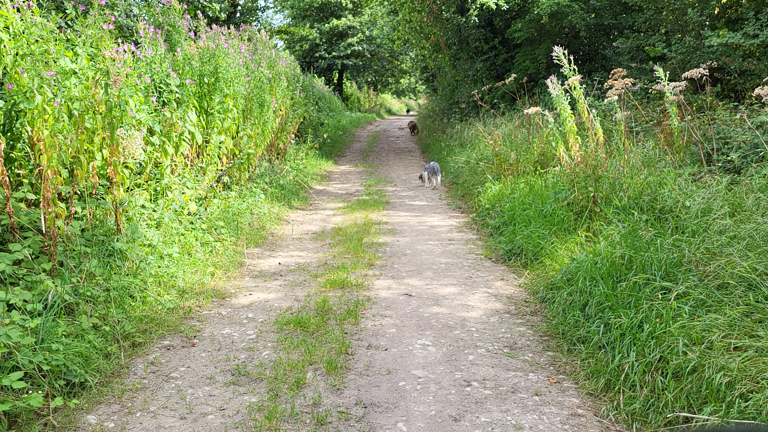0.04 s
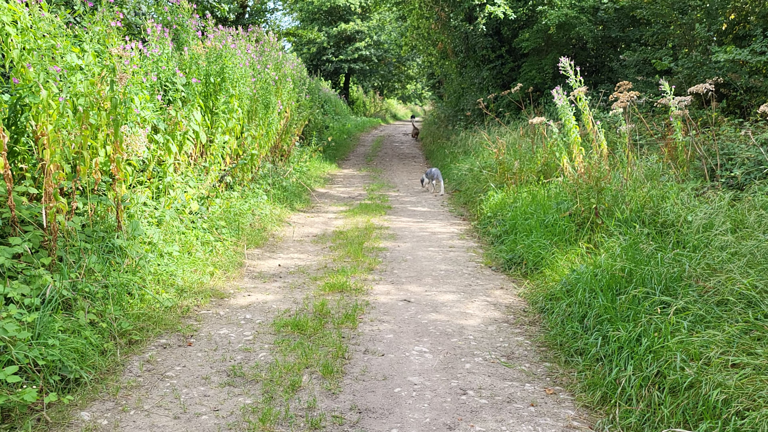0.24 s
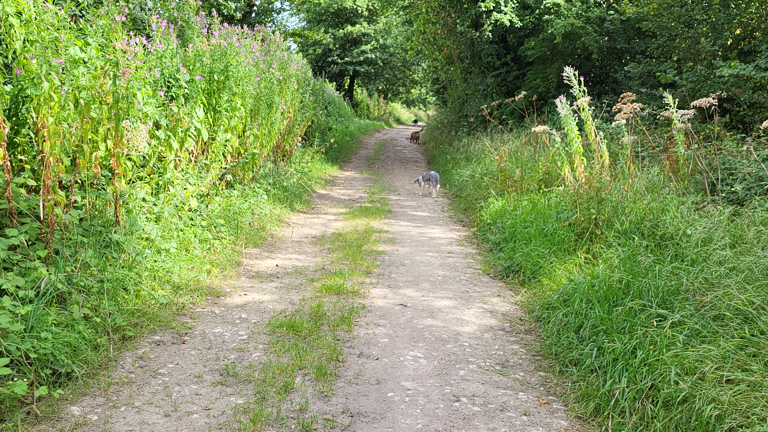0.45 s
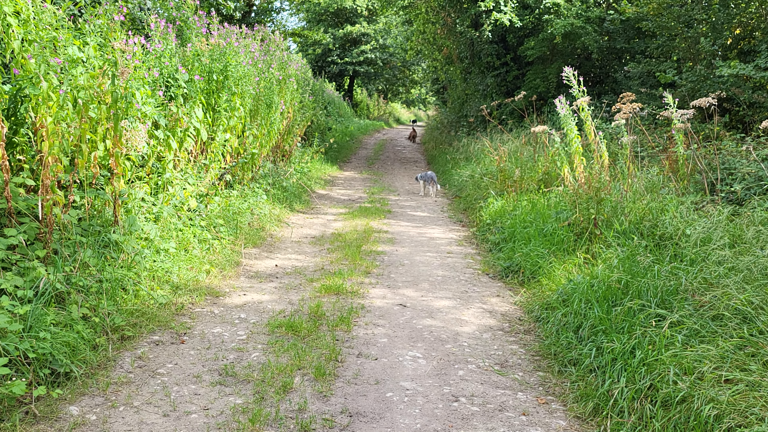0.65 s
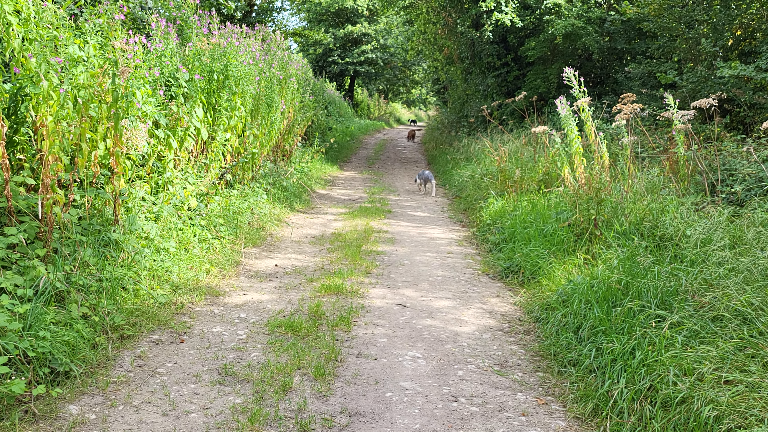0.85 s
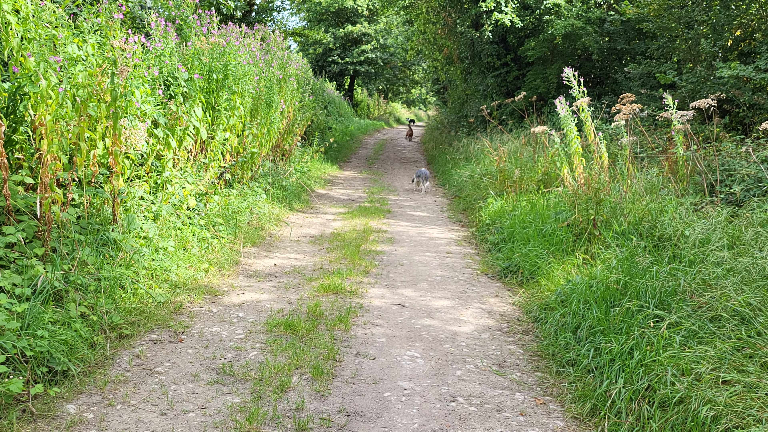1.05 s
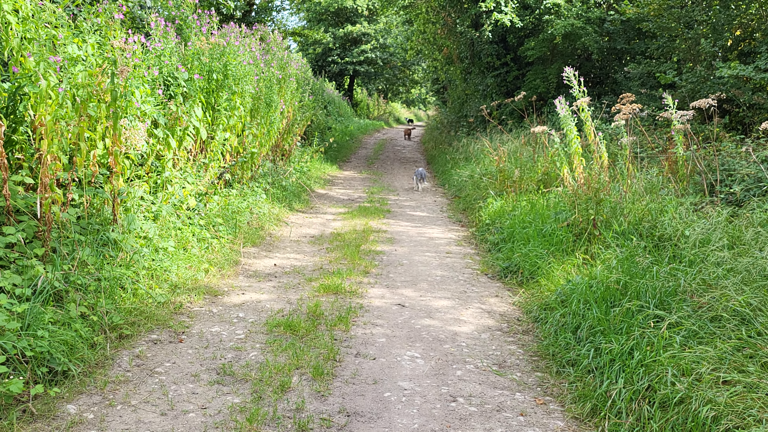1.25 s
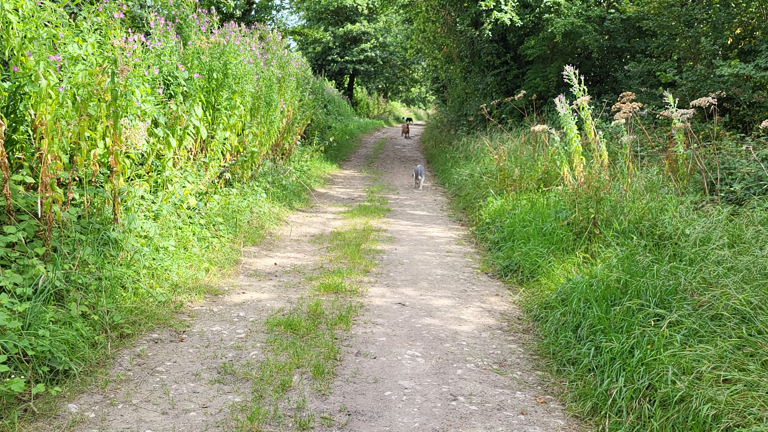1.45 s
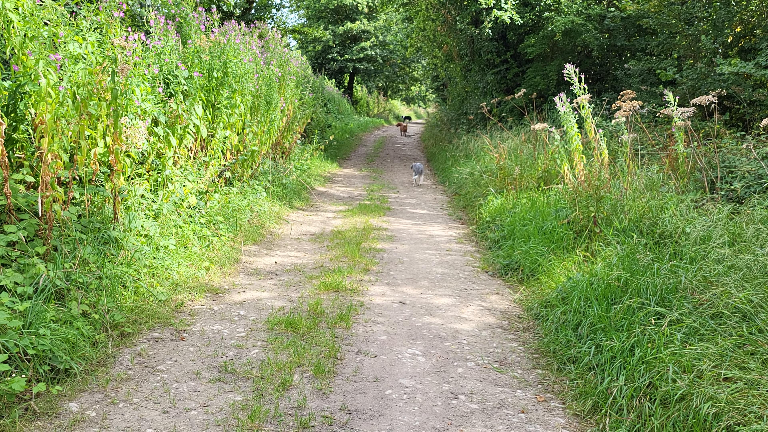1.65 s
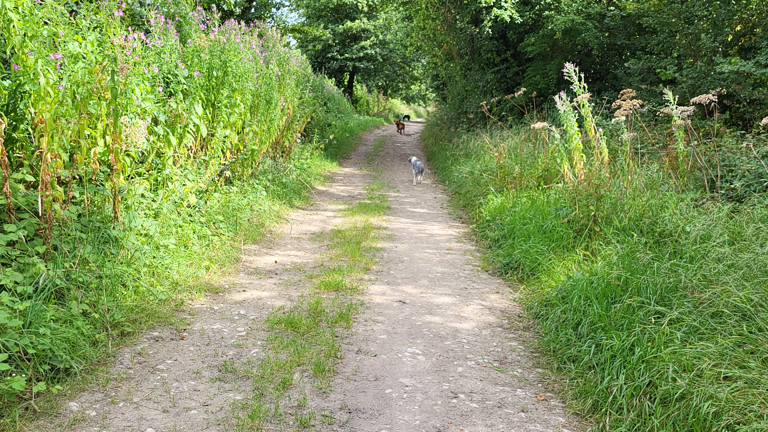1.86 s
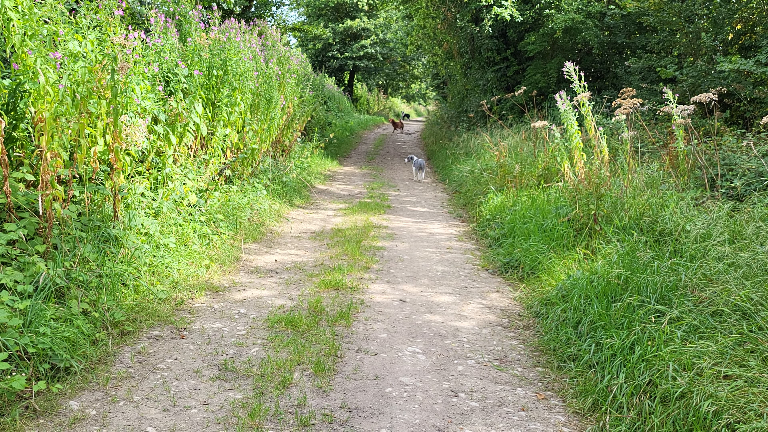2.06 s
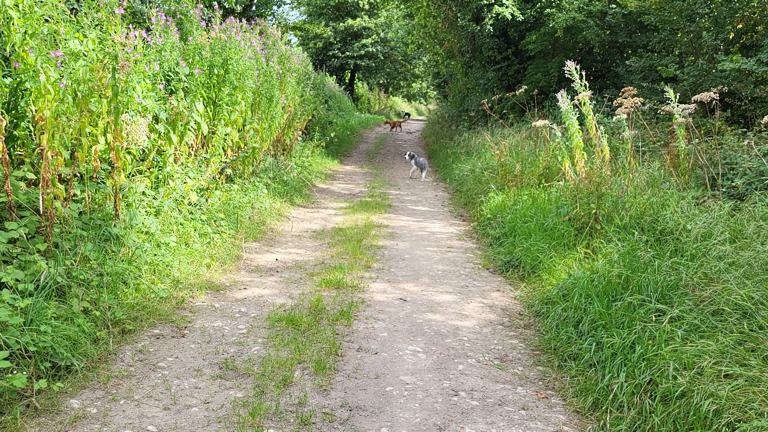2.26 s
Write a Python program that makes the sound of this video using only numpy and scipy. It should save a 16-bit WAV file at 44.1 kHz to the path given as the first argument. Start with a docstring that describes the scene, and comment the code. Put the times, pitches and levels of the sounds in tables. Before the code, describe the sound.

Two sharp, bright rings of a bicycle bell, with lever clicks and wind rumble.

```python
"""Bicycle bell on a gravel track

A thumb bell is rung twice, close to a phone: a tiny hammer cracks against a metal dome, which rings.
The lever clicks as it is cocked and let go, a hand or sleeve brushes nearby, and grit ticks under
the tyres. Wind buffets the phone's two microphone openings, mostly the right one."""
import sys
import numpy as np
from scipy import signal
from scipy.fft import rfft, irfft
from scipy.io import wavfile
from scipy.ndimage import uniform_filter1d, map_coordinates

SR = 44100
rng = np.random.default_rng(int(sys.argv[2]) if len(sys.argv) > 2 else 0)


def unload_wav(signal):
    """Save mono or channel-first audio to the path in sys.argv[1] as 16-bit WAV at rate SR, clipped to [-1, 1]."""
    wavfile.write(
        sys.argv[1],
        SR,
        np.round(np.clip(np.atleast_2d(signal).T, -1, 1) * 32767).astype(np.int16),
    )


N = 105840
T = np.arange(N) / SR

# hammer blows (time [s], ring level [dB], boost of the top tone [dB], crack level [dB], crack treble [dB])
BLOWS = [(1.2971, -3, 8, -10.5, 2), (1.7596, 1.5, 5, -14.5, 3)]
# the dome's tones, each with a twin close in pitch (pitch [Hz], twin's offset [Hz])
TONE_PITCHES = [(1900.6, 23.7), (4934.5, -7), (6845, 14), (8795, -5), (8813, -3), (9873, 12), (10730, 19),
                (13293, 12), (13750, 9)]
# how each of those tones rings (level [dB], time to fade 60 dB [s], left minus right [dB],
# lag at the left [rad], twin's left gain [ratio], twin's right gain [ratio])
TONE_RINGS = [(-28, 0.71, -3.5, 2.12, -0.1, 0.99), (-20.5, 1.56, 2.5, 2.03, -0.01, 0.74),
              (-60, 0.33, -21, 0.67, 0, 1), (-23.5, 0.47, -1, 0.37, -1.7, 0.8),
              (-15, 0.62, 7, 1.46, -0.25, -0.1), (-51, 0.27, 2, 0.69, -.7, -.7),
              (-46.5, 0.43, 6, 4.4, .7, 0.83), (-14.5, 0.14, 5.5, 2.7, -0.16, 0.2),
              (-60, .42, 26, 4.2, .3, .3)]
# rise and fall of the longest tone (time [s], left level [dB], right level [dB])
LONG_TONE_WAVER = [(1.3, 7, -1.5), (1.361, -1, 9.5), (1.409, 2, 6), (1.521, -3, -4.5), (1.6, -9, -12),
                   (1.659, -14, 6), (1.7, 4, 5), (1.762, -4, -10), (1.788, 3.5, 4), (1.826, -10.5, 8),
                   (1.881, 3.5, 4.5), (1.959, -14.5, 5), (2.024, 3.5, -13), (2.11, -6, 6),
                   (2.188, -8.5, 0.5), (2.279, -9, -18), (2.328, -20, 1), (2.4, -1.5, -14.5)]
LONG_TONE_HZ, TWIN_FADE_S, OLD_RING_DB = 4934.5, 2.4, -18


def bell():
    """Each blow damps the old ring and starts new tones, which throb against their faster-fading twins."""
    out = np.zeros((2, N))
    times, left_db, right_db = np.array(LONG_TONE_WAVER).T
    waver = undb([np.interp(T, times, left_db), np.interp(T, times, right_db)])
    for start, db, boost_db, _, _ in BLOWS:
        out *= np.where(T >= start, undb(OLD_RING_DB), 1)
        turn = 2j * np.pi * (T - start)
        for (hz, offset_hz), tone in zip(TONE_PITCHES, TONE_RINGS):
            tone_db, fade_s, pan_db, lag, twin_left, twin_right = tone
            twin = np.array([[twin_left], [twin_right]]) * np.exp(turn * offset_hz)
            throb = 1 + twin * fade(start, TWIN_FADE_S) + 0.36 * wander(per_s=36)
            wave = np.exp(turn * hz - 1j * np.array([[lag], [0]]))
            ring = (throb * wave).imag * fade(start, fade_s) * (waver if hz == LONG_TONE_HZ else 1)
            bright_db = boost_db * (hz / np.max(TONE_PITCHES)) ** 2
            out += ring * pan(pan_db) * undb(db + tone_db + bright_db)
    return out


# tone colour of the hammer's crack (frequency [Hz], relative level [dB])
CRACK_COLOUR = [(200, -33), (800, -17.5), (1400, -10), (2100, -4.5), (2900, -21), (4200, -14.5),
                (6500, -11), (8200, -0.5), (10000, -8.5), (13000, -1.5), (16000, -29.5)]
CRACK_RISE_S, BLOW_PAN_DB = 0.00088, -4.5


def hammer():
    """Each blow makes a sharp crack, then the hammer's spring gives a short, duller buzz."""
    out = 0
    for start, _, _, db, treble_db in BLOWS:
        rise = (T < start) * np.exp(-abs(T - start) / CRACK_RISE_S)
        spring = undb(-10.5) * fade(start, seconds=0.15) * treble(handlebar_noise(), db=-15)
        crack = (rise + fade(start, seconds=0.0084)) * handlebar_noise()
        out += undb(db) * treble(crack + spring, treble_db)
    return colour(out, CRACK_COLOUR) * pan(BLOW_PAN_DB)


# tone colour of the bracket that holds the bell (frequency [Hz], relative level [dB])
BRACKET_COLOUR = [(300, -25), (1000, -22), (1400, -9), (2300, -6), (3000, -14.5), (12000, -34.5)]


def bracket():
    """Each blow also shakes the bracket, which clanks briefly."""
    shake = sum(fade(start, seconds=0.02) for start, *_ in BLOWS)
    return colour(shake * handlebar_noise(), BRACKET_COLOUR) * undb(-22) * pan(BLOW_PAN_DB)


# lever and handlebar clicks (time [s], level [dB], treble [dB], slide compared with snap [dB])
LEVER_CLICKS = [(1.047, -15, -16.5, -18), (1.3752, -17, 2.5, -18.5), (1.4511, -33, -19, -10),
                (1.676, -51.5, 0, -8), (1.7104, -31.5, -2.5, -12.5), (1.73, -43, -12, -8),
                (1.8097, -35.5, -18.5, -28), (2.048, -41, -8, -19), (2.1356, -28, 2.5, -18),
                (2.214, -44, 0.5, -15), (2.225, -32, -38, -9.5), (2.251, -38.5, -53, -13.5),
                (2.353, -41.5, -37, -18.5)]
# tone colour of the plastic housing (frequency [Hz], relative level [dB])
PLASTIC_COLOUR = [(200, -34), (600, -2), (1300, -1), (2200, 5), (3200, -14), (4300, -2), (5500, -7.5),
                  (8000, -1.5), (9500, -10.5), (15500, -15)]
SLIDE_S = 0.011


def lever():
    """Plastic parts slide, snap against their stop and settle."""
    out = 0
    for start, db, treble_db, slide_db in LEVER_CLICKS:
        slide = undb(slide_db) * np.exp(-abs(T - start) / SLIDE_S)
        snap = fade(start, seconds=0.0046)
        settle = undb(-16) * fade(start, seconds=0.052)
        out += undb(db) * treble((slide + snap + settle) * handlebar_noise(), treble_db)
    return colour(out, PLASTIC_COLOUR) * pan(-4.5)


# brushes of a hand or sleeve (time [s], half length [s], level [dB], treble [dB],
# left minus right [dB], rough pitch [Hz], relative level of that pitch [dB])
SLEEVE_BRUSHES = [(0.095, 0.03, -40.5, -12, 0, 1193, -4), (0.148, 0.023, -53, -0.5, 13, 864, -1),
                  (0.637, 0.077, -61, 10.5, 3.5, 2590, 3), (0.735, 0.09, -49.5, -11, 1.5, 3013, -1),
                  (0.875, .033, -52, 0.5, -3, 1741, 8.5), (1.08, .14, -52.5, -5.5, 0.5, 2070, -11.5),
                  (2.242, 0.12, -70.5, -23.5, -8, 647, 12)]
# tone colour of rubbing cloth (frequency [Hz], relative level [dB])
CLOTH_COLOUR = [(200, 6), (800, -6.5), (1700, -3), (3300, -3.5), (5500, -5), (8000, 3.5), (10000, -6.5),
                (15500, -9)]


def brushes():
    """Cloth rubs in soft, grainy swells, each with a rough pitch of its own."""
    out, cloth = 0, colour(noise(), CLOTH_COLOUR)
    for centre, half_s, db, treble_db, pan_db, hz, pitch_db in SLEEVE_BRUSHES:
        swell = np.exp(-((T - centre) / half_s) ** 2 / 2)
        rub = treble(cloth, treble_db) + undb(pitch_db) * pitched_noise(hz, width_hz=750)
        out += undb(db) * pan(pan_db) * swell * rub
    grain = undb(4.5 * wander(per_s=400))
    return out * grain


# the scuff in the first brush (time [s], pitch [Hz], level [dB])
SCUFF_GLIDE = [(0.061, 650, -46), (.098, 611, -42), (0.107, 642, -31), (0.122, 405, -36), (0.131, 340, -53)]


def scuff():
    """A short rub falls in pitch as it slows."""
    times, hz, db = np.array(SCUFF_GLIDE).T
    swell = np.interp(T, times, undb(db), left=0, right=0)
    return pitched_noise(np.interp(T, times, hz), width_hz=200) * swell * pan(-10.5)


# strength of the wind (time [s], relative level [dB])
GUSTS = [(0.0, -35), (0.2, -45.5), (0.23, -23.5), (0.29, -25), (0.31, -34), (0.56, -29), (0.67, -39.5),
         (0.74, -33), (0.83, -43), (0.91, -25), (0.99, -42.5), (1.11, -27), (1.16, -34), (1.27, -26.5),
         (1.32, -46.5), (1.52, -26), (1.54, -40), (1.59, -30), (1.69, -43), (1.74, -26.5), (1.92, -44.5),
         (1.96, -25.5), (2.19, -32.5), (2.4, -50)]
# tone colour of the churning air (frequency [Hz], relative level [dB])
WIND_COLOUR = [(20, -7), (40, -3.5), (60, 5.5), (100, -2.5), (160, -12.5), (250, -23), (400, -42),
               (800, -52), (2000, -72.5)]
# strong swirls of air (time [s], level [dB], rough half width [s], left minus right [dB])
SWIRLS = [(.028, -39.5, 0.00053, 19), (0.233, -23, 0.0019, -15.5), (0.262, -21, 0.0017, -23),
          (0.282, -17.5, .0025, -17.5), (.365, -22, 0.0022, -17.5), (0.415, -31.5, 0.0011, -27.5),
          (0.424, -23, .003, -29.5), (0.442, -34, 0.0015, -38.5), (0.544, -26.5, 0.0032, -34),
          (0.7409, -24, 0.0015, -25.5), (.904, -32.5, .0011, -23), (1.043, -33.5, .003, -34),
          (1.106, -27, .0014, -29.5), (1.263, -25, 0.0023, -34.5), (1.402, -30, .003, -29.5),
          (1.508, -27.5, .002, -28.5), (1.59, -23, 0.0016, -28.5), (1.963, -34.5, 0.0011, -37),
          (1.98, -37.5, 0.00083, -29), (2.142, -36, .0015, -40.5), (2.181, -36, 0.0011, -27),
          (2.208, -31.5, 0.003, -32.5)]
WIND_LEFT_DB, WIND_RIGHT_DB = -22.5, 6


def wind():
    """Churning air rumbles; each strong swirl sucks briefly, mostly at one opening, and thumps."""
    strength = undb(np.interp(T, *np.array(GUSTS).T))
    fluttering_air = noise() * strength * undb(1.5 * wander(per_s=40.56))
    out = colour(fluttering_air, WIND_COLOUR) * undb([[WIND_LEFT_DB], [WIND_RIGHT_DB]])
    for centre, db, half_s, pan_db in SWIRLS:
        gap_squared = ((T - centre) / (2 * half_s)) ** 2
        suction = (1 - 3 * gap_squared) / (1 + gap_squared) ** 3
        out -= pan(pan_db) * undb(db) * suction
    return out


# tone colour of tyres and open air (frequency [Hz], relative level [dB])
TYRE_COLOUR = [(100, 7), (300, 4), (700, -9), (1300, -20), (2100, -10.5), (3500, -17.5), (5500, -13),
               (8000, -7), (10000, -18.5), (15500, -24.5)]
HISS_DB, GRIT_DB, GRIT_PER_S = -63.5, -70.5, 270


def tyres():
    """Tyres hiss faintly and grit ticks under them."""
    ticks = rng.random(N) < GRIT_PER_S / SR
    grit = ticks * noise() * np.sqrt(SR / GRIT_PER_S)
    hiss = undb(HISS_DB + 0.5 * wander(per_s=3.1)) * noise()
    return colour(hiss + undb(GRIT_DB) * grit, TYRE_COLOUR)


def undb(db):
    """Turn decibels into a number to multiply by."""
    return 10 ** (np.asarray(db) / 20)


def pan(db):
    """Gains that make the left side db louder than the right."""
    return undb(np.array([[db], [-db]]) / 2)


def fade(start, seconds):
    """Start suddenly, then fade by 60 dB in the given time."""
    return (T >= start) * np.exp(-np.log(1000) * np.maximum(T - start, 0) / seconds)


def noise():
    """Separate white noise for left and right."""
    return rng.standard_normal((2, N))


def wander(per_s):
    """Smooth random drift, different on each side."""
    step = max(int(SR / per_s), 2)
    held = noise()[:, np.arange(N) // step]
    return 0.54 * uniform_filter1d(uniform_filter1d(held, step), step)


def handlebar_noise(lag_s=0.0001384, share=0.44):
    """Noise from the handlebar: both sides share a part, which reaches the left later."""
    shared = rng.standard_normal(N)
    late = map_coordinates(shared, [(T - lag_s) * SR], mode="mirror")
    return np.sqrt(share) * np.array([late, shared]) + np.sqrt(1 - share) * noise()


def pitched_noise(hz, width_hz):
    """Noise gathered around one pitch, which may move."""
    phase = 2 * np.pi * np.cumsum(hz * np.ones(N)) / SR
    return wander(2 * width_hz) * np.cos(phase) + wander(2 * width_hz) * np.sin(phase)


def treble(x, db, above_hz=3240):
    """Turn the high frequencies up or down."""
    low = signal.sosfiltfilt(signal.butter(2, above_hz, fs=SR, output="sos"), x)
    return low + undb(db) * (x - low)


def colour(x, points):
    """Give a sound a tone colour; white noise keeps its overall power."""
    hz, db = np.array(points, float).T
    size = 2 * N
    curve = undb(np.interp(np.log(np.arange(N + 1) * SR / size + 1), np.log(hz), db))
    gain = curve / np.sqrt(np.mean(curve ** 2))
    # make the filter ring only after a sound, never before it
    cepstrum = irfft(np.log(gain))
    cepstrum[1:N] *= 2
    cepstrum[N + 1:] = 0
    return irfft(rfft(x, size) * np.exp(rfft(cepstrum)))[..., :N]


def scene():
    """All the sounds together, left and right."""
    return bell() + hammer() + bracket() + lever() + brushes() + scuff() + wind() + tyres()


def record(dry, lowest_hz=28, highest_hz=16150, limit=0.8):
    """The phone cuts the deepest rumble, clips the loudest peaks and cuts the highest treble."""
    low_cut = signal.butter(2, lowest_hz, "high", fs=SR, output="sos")
    high_cut = signal.ellip(8, 0.2, 70, highest_hz, fs=SR, output="sos")
    clipped = np.clip(signal.sosfilt(low_cut, dry), -limit, limit)
    return signal.sosfilt(high_cut, clipped)


dry = scene()
out = record(dry)
unload_wav(out)
```